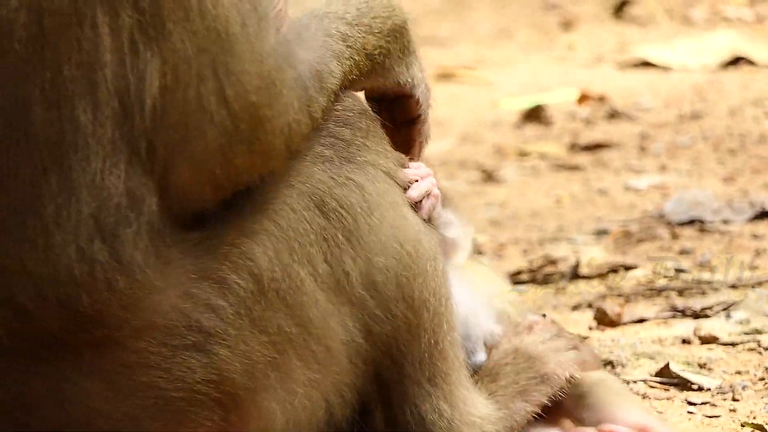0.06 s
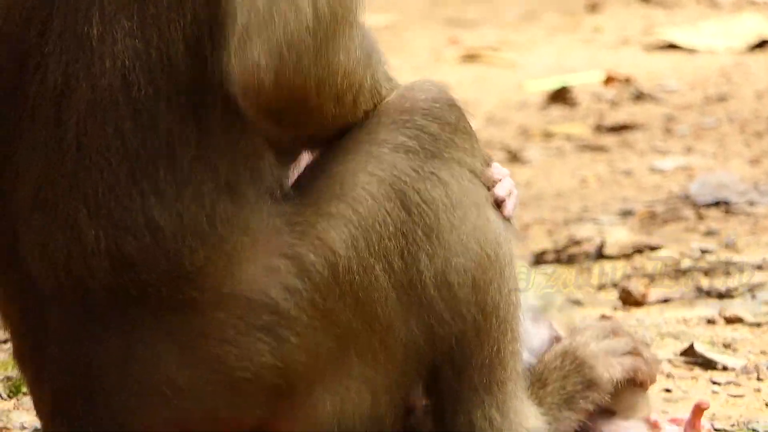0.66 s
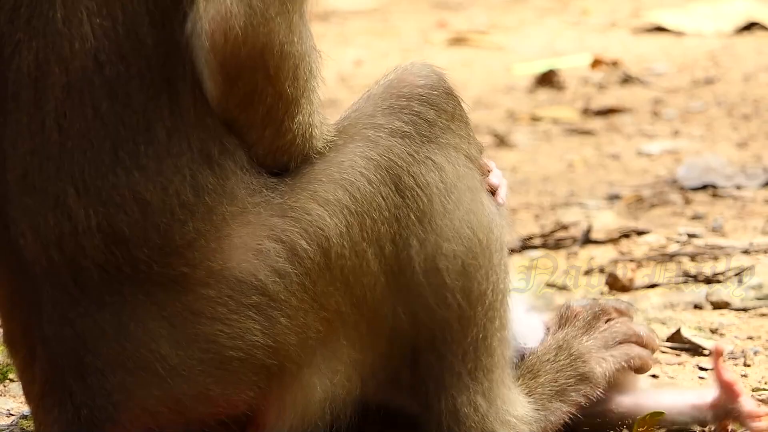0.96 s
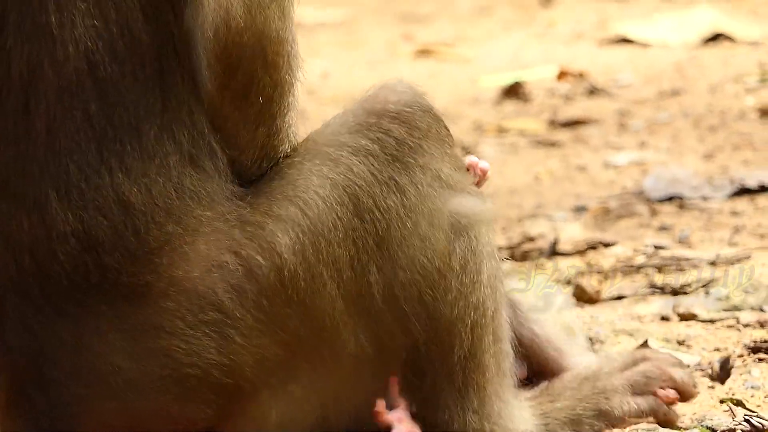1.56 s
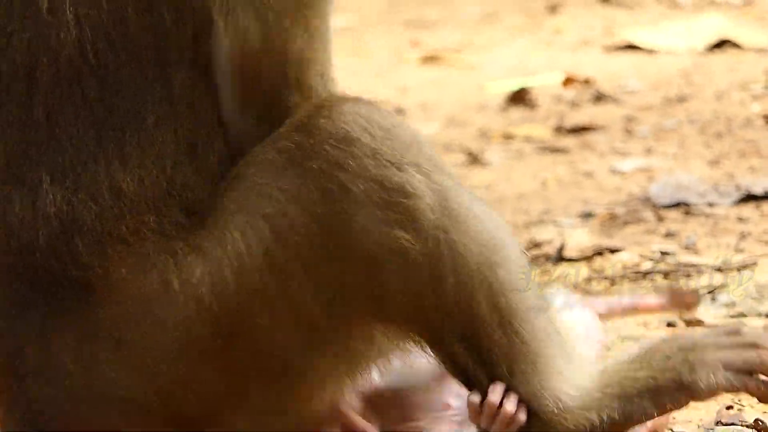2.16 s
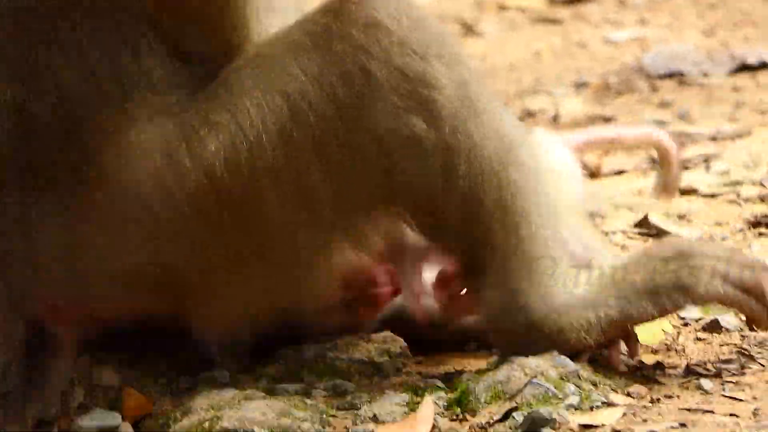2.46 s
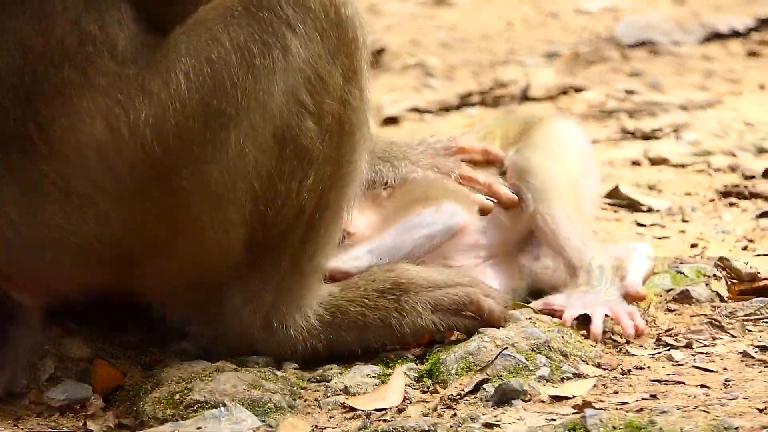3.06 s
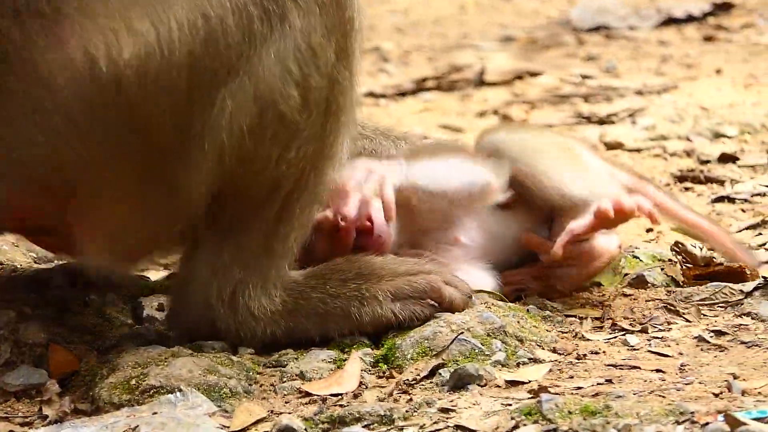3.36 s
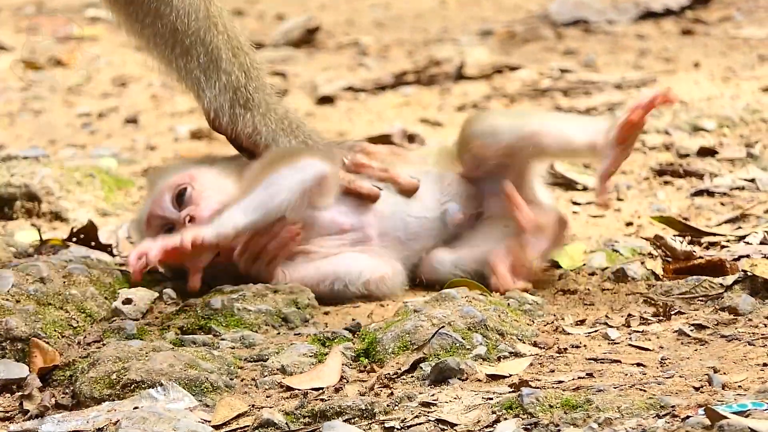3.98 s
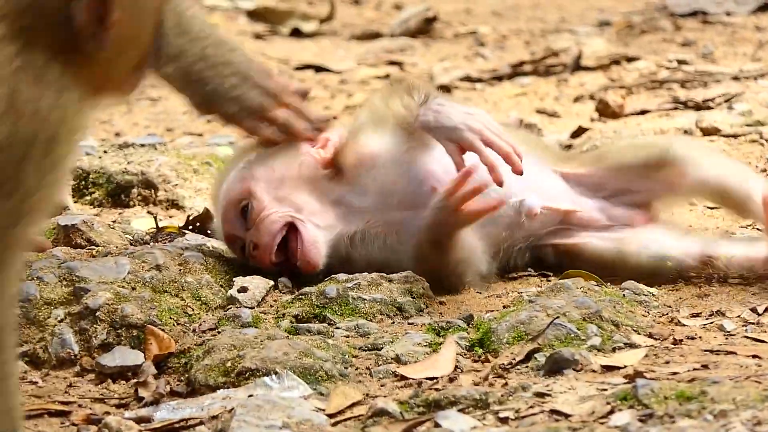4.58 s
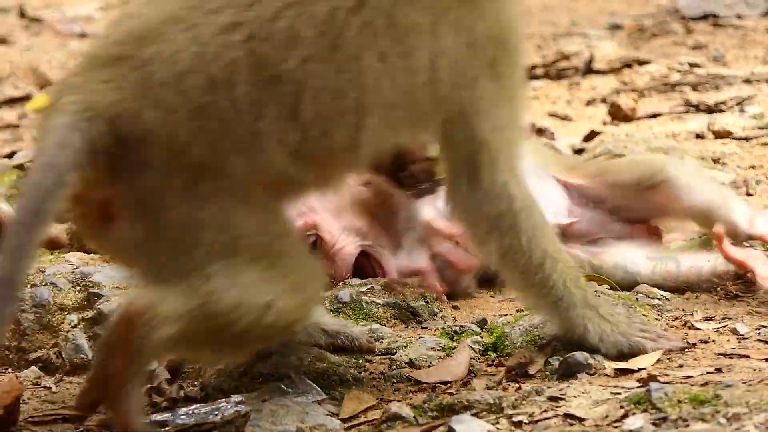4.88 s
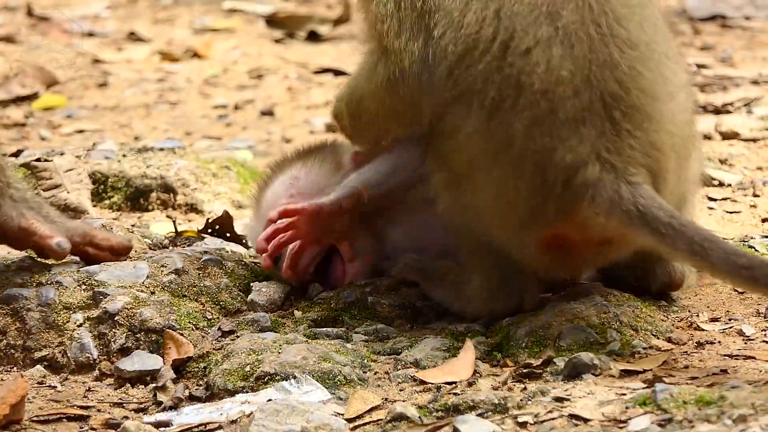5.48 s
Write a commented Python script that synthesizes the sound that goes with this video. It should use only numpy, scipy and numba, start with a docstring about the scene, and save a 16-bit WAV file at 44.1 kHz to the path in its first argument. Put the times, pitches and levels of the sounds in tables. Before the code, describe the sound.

Shrill, raspy cries from a baby monkey come in quick bursts, mixed with thin whistles, small gasps and light leaf scuffs.

```python
"""Faint far calls and leafy scuffs, then a fast run of harsh screeches from an infant macaque close by.
An adult holds it down on dry ground. Its vocal folds flip between chaos, a strained tone and thin
whistles, its throat and mouth ring along, and it gasps between the last cries.
Trees return a soft tail of echoes; outdoor air and a low distant rumble lie behind."""
import sys
import numpy as np
from scipy import signal
from scipy.fft import rfft, irfft, next_fast_len
from scipy.io import wavfile
from scipy.ndimage import uniform_filter1d
from numba import njit

SR = 44100
rng = np.random.default_rng(int(sys.argv[2]) if len(sys.argv) > 2 else 0)


def master(y):
    """Save y as 16-bit WAV."""
    cut = np.clip(np.atleast_2d(y).T, -1, 1)
    pcm = np.round(cut * 32767)  # scale
    wavfile.write(sys.argv[1], SR, pcm.astype(np.int16))


N = 252724
TIME = np.arange(N) / SR

# A cry is two pushes with a break between. Each row: start, break and end in seconds; first push, second
# push and dip at the break in dB; mouth resonance in each push and its width in Hz; throat and shrill
# top in dB. These are base values, which CRY_STAGES bends.
CRIES = [(1.142, 1.161, 1.19, -48.5, -66, 1, 4000, 3800, 1180, -43, -67.5),
         (1.302, 1.335, 1.373, -26.5, -28, 5, 4250, 3840, 950, -42, -45),
         (1.483, 1.514, 1.532, -33.5, -33, 2, 4700, 3590, 1900, -34.5, -42.5),
         (1.738, 1.753, 1.83, -32.5, -47, 6, 3650, 3426, 1320, -49.5, -53),
         (2.146, 2.154, 2.193, -39.5, -67, 11, 4600, 4600, 2000, -39, -57),
         (2.253, 2.302, 2.314, -18, -12.5, 10.5, 3950, 4314, 1283, -35.5, -35.5),
         (2.559, 2.601, 2.624, -22, -22, 12.5, 4150, 3970, 1020, -36, -35),
         (2.804, 2.831, 2.855, -31, -40, -3.5, 3350, 3266, 1005, -37.5, -51),
         (2.857, 2.898, 2.906, -32, -41, 3.5, 3247, 3460, 950, -39, -44.5),
         (3.033, 3.077, 3.157, -25, -24.5, 8.5, 3650, 4070, 1300, -34, -39),
         (3.313, 3.34, 3.365, -34.5, -40, 3, 3600, 3166, 1196, -35.5, -48),
         (3.379, 3.383, 3.397, -25.5, -33.5, -1.5, 3200, 3500, 910, -37, -47.5),
         (3.549, 3.565, 3.598, -38, -50.5, 30, 3500, 3400, 1610, -39, -48.5),
         (3.737, 3.767, 3.778, -38.5, -48, 12, 3310, 3547, 1087, -39, -49),
         (3.916, 3.957, 4.022, -32.5, -28.5, 10.5, 3850, 4067, 1096, -33.5, -39),
         (4.146, 4.198, 4.256, -29.5, -25, 5, 4200, 4454, 1400, -32, -34.5),
         (4.447, 4.488, 4.602, -25.5, -27.5, 3.5, 4500, 4750, 1667, -36, -30.5),
         (4.783, 4.867, 4.99, -30.5, -32.5, 0, 4065, 5400, 1570, -39, -43),
         (5.158, 5.222, 5.312, -29, -30.5, 0.5, 4400, 4800, 1586, -37.5, -44),
         (5.495, 5.537, 5.6, -27, -24, 3.5, 3450, 4317, 1396, -31.5, -44)]
# The airway's tone, with a gap near 1600 Hz. Each row: frequency in Hz, gain in dB.
AIRWAY_TONE = [(500, -17), (800, 6), (1400, -2.5), (1600, -9.5), (1720, -7), (2020, 1), (2450, 1),
               (2700, 1.5), (3000, 0.5)]


def screeches(whistling, attack_s=0.0044, release_s=0.0058, rasp_db=1.5, rasp_hz=130):
    """The infant's vocal folds make its mouth, throat, teeth and chest ring."""
    mouth_db, mouth_hz, width_hz, throat_db, top_db, chest_db = cry_course(CRIES)
    pitch, rough, boost_db = fold_state()
    gate = np.max([held(start, end, attack_s, release_s) for start, _, end, *_ in CRIES], axis=0)
    buzz = vocal_folds(pitch, rough)
    # a whistle takes its share of the air from the rough voice
    whistle_share = uniform_filter1d(whistling ** 2, SR // 200) / from_db(2 * mouth_db)
    air_left = np.sqrt(np.clip(1 - whistle_share, .3, 1))
    voice = from_db(mouth_db) * mouth(buzz, rough, mouth_hz, width_hz) * air_left
    voice += from_db(throat_db + boost_db) * throat(buzz, pitch)
    voice += from_db(top_db) * teeth(buzz)
    voice += from_db(chest_db) * chest(buzz)
    # the folds catch and let go unevenly
    rasp = rms_one(from_db(rasp_db * np.clip(wander(rasp_hz), -2, 1.5)))
    return coloured(voice * rasp * gate, AIRWAY_TONE)


# The five stages of a cry: onset, first push, break, second push, end. Each row: mouth change in dB,
# mouth resonance multiplier, throat change in dB, top change in dB, chest relative to throat in dB.
CRY_STAGES = [(-5, 0.93, -6, -3.5, -17.5), (0.5, 0.98, -3, -2.5, -12.5), (0, 0.94, 0.5, -3.5, -10),
              (0.5, 0.99, -5.5, 1.5, -11.5), (-4, 0.92, -15.5, -7, -5.5)]


def cry_course(cries, swell_s=.016, recover_s=.025):
    """Curves through each cry: mouth level, resonance and width, then throat, top and chest levels."""
    mouth_step, mouth_ratio, throat_step, top_step, chest_step = np.transpose(CRY_STAGES)
    rows = []
    for start, crack, end, db1, db2, dip_db, hz1, hz2, width_hz, throat_base, top_base in cries:
        push1 = min(start + swell_s, (start + crack) / 2)
        push2 = min(crack + recover_s, (crack + end) / 2)
        effort_db = two_pushes(db1, db2, dip_db)
        swing_db = effort_db - (db1 + db2) / 2   # the shrill top follows the effort
        throat_db = throat_base + throat_step
        rows += zip([start, push1, crack, push2, end], effort_db + mouth_step,
                    two_pushes(hz1, hz2, 0) * mouth_ratio, [width_hz] * 5,
                    throat_db, top_base + top_step + swing_db, throat_db + chest_step)
    times, *columns = np.transpose(rows)
    return [np.interp(TIME, np.sort(times), column) for column in columns]


def two_pushes(first, second, dip):
    """A value at the five stages: held through each push, lowered by dip at the break."""
    return np.array([first, first, (first + second) / 2 - dip, second, second])


# Moments of strained tone. Each row: start and length in seconds; first, middle and last pitch in Hz;
# roughness from 0 to 1; throat boost in dB.
STRAINS = [(3.985, .035, 2230, 1999, 2252, 0.33, 11), (4.229, 0.045, 2216, 2239, 2137, 0.48, -4.5),
           (4.532, 0.099, 2348, 2349, 2139, 0.37, -0.5), (4.78, 0.0128, 2299, 2296, 2222, 0.33, 18),
           (4.86, 0.021, 2274, 2341, 2336, 0.48, -11), (4.888, .04, 2281, 2291, 2479, 0.38, 7),
           (5.211, .075, 2172, 2281, 1995, 0.2, 1), (5.496, 0.019, 2450, 2341, 2233, 0.23, 7),
           (5.539, 0.017, 2300, 2397, 2258, 0.47, 7)]


def fold_state(chaos_hz=2195.0, chaos_roughness=.88, lock_s=0.00783):
    """Pitch, roughness and throat boost: chaos, except where the folds lock onto an arc of pitch."""
    pitch, rough, boost_db = np.full(N, chaos_hz), np.full(N, chaos_roughness), np.zeros(N)
    for start, length, first, middle, last, roughness, db in STRAINS:
        lock = held(start, start + length, lock_s, lock_s)
        progress = np.clip((TIME - start) / length, 0, 1)
        arc = np.polyval(np.polyfit([0, .5, 1], [first, middle, last], 2), progress)
        pitch += lock * (arc - pitch)
        rough += lock * (roughness - rough)
        boost_db += lock * db
    return pitch, rough, boost_db


def vocal_folds(pitch, rough):
    """Puffs of air that throb at a third of the pitch; roughness upsets their timing and strength."""
    rough = np.clip(rough, 0, 1) ** 1.4
    waver = .03 * (rough + .15) * wander(800) + .05 * rough * wander(120)
    phase = 2 * np.pi * np.cumsum(pitch * (1 + waver)) / SR
    pulses = rms_one(sum(np.cos(k * phase) for k in np.arange(1, 8)))
    throb = 1.15 * np.cos(phase / 3 + rough * wander(300))
    strength = 1 - .45 * rough + throb + 1.1 * rough * wander(1000)
    breath = .5 * (rough + .2) * rng.standard_normal(N) * (1 + np.cos(phase) / 2)
    return pulses * strength + breath


# The mouth's steady peaks and gaps. Each row: frequency in Hz, gain in dB.
MOUTH_TONE = [(1000, -20), (1700, -30), (2300, -10), (2700, -7), (3150, 3), (3700, 0), (4350, 2),
              (4850, -2), (5400, 1), (6500, 1), (7500, -4), (9000, -12)]


def mouth(buzz, rough, hz, width_hz):
    """A quivering resonance; the narrower it is, the more of a rough cry turns into squeal."""
    quiver = 1 + .055 * wander(70)
    ring = steep_resonance(buzz, hz * quiver, 1.57 * width_hz)
    ring = evened(coloured(ring, MOUTH_TONE), window_s=0.0122)
    squeal_share = np.clip(rough * (1900 - width_hz) / 1500 * (1 + .6 * wander(50)), 0, .8)
    return np.sqrt(1 - squeal_share) * ring + np.sqrt(squeal_share) * squeal(hz)


def squeal(hz):
    """The folds lock onto the mouth resonance and zigzag around it."""
    zigzag = 1 + .085 * wander(160) + .04 * wander(900)
    phase = 2 * np.pi * np.cumsum(hz * zigzag) / SR
    return np.sqrt(2) * (np.sin(phase) + .08 * np.sin(2 * phase))


def throat(buzz, pitch, rest_hz=2250):
    """The throat rings midway between its own note and the pitch of the folds."""
    hz = np.sqrt(rest_hz * pitch) * (1 + .04 * wander(60))
    return evened(steep_resonance(buzz, hz, width_hz=560), window_s=0.0097)


# High resonances at the teeth. Each row: frequency in Hz, width in Hz, relative level in dB.
TEETH_RINGS = [(7190, 610, 3.5), (8850, 950, 1.5), (9840, 220, 10.5), (10720, 640, 2), (11600, 1700, -8),
               (14700, 1400, -19)]


def teeth(buzz, roaming_hz=10000):
    """The shrill top of the cry: steady resonances plus one that roams."""
    steady = rms_one(cavity(buzz, TEETH_RINGS))
    roaming = rms_one(steep_resonance(buzz, roaming_hz * (1 + .09 * wander(35)), width_hz=800))
    return evened(steady + .7 * roaming, window_s=0.013)


# Low resonances of the airway. Each row: frequency in Hz, width in Hz, relative level in dB.
CHEST_RINGS = [(860, 260, 0), (1300, 380, -3)]


def chest(buzz):
    """The chest rings low and gives the cry some body."""
    return evened(cavity(buzz, CHEST_RINGS), window_s=0.0098)


# Thin whistles. Each row: start and length in seconds, first and last pitch in Hz, level in dB.
WHISTLES = [(1.474, 0.013, 6300, 5600, -31), (1.522, 0.021, 2930, 2960, -30.5),
            (1.536, 0.028, 3150, 4200, -36), (1.55, 0.0086, 5060, 5630, -26.5),
            (1.559, 0.016, 5800, 4950, -32.5), (2.125, .02, 5398, 4900, -36),
            (2.243, .015, 2700, 3320, -33.5), (2.319, .019, 4170, 4580, -18),
            (2.339, .028, 4130, 4630, -20.5), (2.38, 0.015, 5676, 5280, -27),
            (2.546, .008, 4690, 5330, -25.5), (2.612, 0.016, 3700, 4680, -24.5),
            (2.649, 0.0085, 4600, 3820, -33.5), (2.859, .012, 2920, 3320, -27.5),
            (3.138, 0.01446, 3448, 4500, -33), (3.155, 0.015, 4720, 3300, -28.5),
            (3.183, 0.024, 4380, 4480, -34), (4.226, 0.0575, 4400, 4200, -27),
            (4.545, 0.06, 11200, 9800, -37.5), (4.884, .022, 5605, 5050, -33.5),
            (4.92, 0.027, 6260, 6220, -36), (5.0, .011, 4700, 3700, -41.5), (5.21, 0.077, 5300, 5050, -33),
            (5.26, 0.037, 3500, 3170, -32.5), (5.313, .017, 4420, 4160, -39),
            (5.494, 0.016, 2810, 3250, -27), (5.578, 0.033, 5200, 5150, -28),
            (5.612, .022, 2850, 2870, -36.5), (5.662, .021, 4050, 4580, -30)]


def whistles():
    """The folds flick into a nearly pure tone, mostly as a cry catches or lets go."""
    return glides(WHISTLES, arch=0.0232, overtone_db=-20, harmonics=2,
                  jitter=.028, jitter_hz=600, flutter_db=2.5, fade=.25)


# The infant's gasps. Each row: start in seconds, length in seconds, level in dB before GASP_TONE.
GASPS = [(4.355, .063, -52), (4.695, .062, -51.5), (5.04, 0.0822, -51), (5.403, 0.061, -53.5)]
# The tone of a gasp. Each row: frequency in Hz, gain in dB.
GASP_TONE = [(300, 8), (430, 2.5), (850, 5), (1300, 4.5), (1700, -11), (2150, 11.5), (2800, -15),
             (6000, -35)]


def gasps(from_hz=370, to_hz=474):
    """Squeaky breaths between the last cries, all rising alike."""
    rises = [(start, length, from_hz, to_hz, db) for start, length, db in GASPS]
    squeaks = glides(rises, arch=0, overtone_db=-.3, harmonics=10,
                     jitter=.015, jitter_hz=400, flutter_db=2, fade=.3)
    return coloured(squeaks, GASP_TONE)


# Scuffs in dry leaves. Each row: start in seconds, base level in dB, the thud's offset from it in dB.
SCUFFS = [(0.239, -48.5, -7), (0.834, -40, -30), (0.954, -48.5, -21), (1.941, -39.5, -31),
          (3.401, -44.5, -12), (4.425, -45, -8.5), (4.674, -34, -18), (5.129, -37, -26), (5.357, -44, -29)]
# The tone of the crackle. Each row: frequency in Hz, relative level in dB.
LEAF_TONE = [(400, -21), (1200, 5), (2500, -10), (5000, 0.5), (11000, -16), (16000, -40)]


def scuffs(rise_s=0.00039, crackle_decay_s=0.017, thud_decay_s=0.079, crackle_db=-8, thud_db=-2):
    """Limbs brush the fallen leaves: a brief crackle over a soft thud."""
    crackle, thud = np.zeros(N), np.zeros(N)
    for start, db, offset_db in SCUFFS:
        age = np.maximum(TIME - start, 0)
        rise = np.minimum(age / rise_s, 1)
        crackle += from_db(db + crackle_db) * rise * np.exp(-age / crackle_decay_s)
        thud += from_db(db + offset_db + thud_db) * rise * np.exp(-age / thud_decay_s)
    grains = rng.standard_normal(N) * from_db(5 * wander(800))
    return crackle * rms_one(coloured(grains, LEAF_TONE)) + thud * noise_band(hz=318, width_hz=110)


# Far calls and hoots. Each row: start and length in seconds, first and last pitch in Hz, level in dB.
FAR_CALLS = [(.075, .16, 1023, 996, -53), (.11, 0.083, 321, 265, -62.5), (.14, 0.069, 401, 410, -60),
             (.21, 0.15, 1026, 775, -53), (.35, 0.14, 1467, 1245, -63), (2.385, 0.13, 960, 816, -48.5),
             (2.43, 0.065, 331, 343, -54.5), (2.46, .12, 853, 694, -50.5), (2.62, .19, 1360, 1250, -59.5),
             (2.99, 0.08, 265, 199, -61), (3.09, 0.12, 201.5, 181, -56.5), (3.22, 0.082, 310, 335, -56)]


def far_calls():
    """Distant voices: faint, nearly pure tones that slide a little."""
    return glides(FAR_CALLS, arch=0.012, overtone_db=-23, harmonics=2,
                  jitter=0.0058, jitter_hz=83, flutter_db=2.5, fade=0.13)


# The tone of the echoes from the trees. Each row: frequency in Hz, gain in dB.
ECHO_TONE = [(200, 8), (1000, 3.5), (2300, 0), (4500, 3.5), (7000, 9), (11000, 1), (16000, 5)]


def trees(sound, tail_s=1.0, tail_db=-17, near_s=0.19, near_db=-15, ground_s=0.00166, ground_db=-14):
    """A ground bounce, a faint short stereo spread, quick echoes nearby, then a long tail from trees."""
    shape = from_db(tail_db) * die_away(tail_s) + from_db(near_db) * die_away(near_s)
    echoes = [coloured(rng.standard_normal(SR), ECHO_TONE) * shape for _ in range(2)]
    middle, side = [signal.fftconvolve(sound, echo)[:N] for echo in echoes]
    bounce = from_db(ground_db) * np.interp(TIME - ground_s, TIME, sound)
    stereo_spread = from_db(-30) * rng.standard_normal(SR) * die_away(seconds=0.013)
    spread = signal.fftconvolve(sound, stereo_spread)[:N]
    return stereo(sound + bounce + middle, from_db(.5) * treble_width(side) + spread)


# The rumble and hiss of outdoor air. Each row: frequency in Hz, relative level in dB.
AIR_TONE = [(15, -89), (25, -35), (70, -19.5), (91, -8), (130, -5.5), (161, -5.5), (317, -14.5), (795, -17),
            (1400, -13), (1740, -19.5), (2160, -20.5), (2410, -21), (6200, -29), (11500, -25), (16000, -46)]


def background(air_db=-57.5, drone_db=-63):
    """Outdoor air, wide only in the treble, and a distant wavering drone."""
    air = rms_one(coloured(rng.standard_normal(N), AIR_TONE)) * from_db(air_db + .4 * wander(3))
    side = rms_one(coloured(rng.standard_normal(N), AIR_TONE)) * from_db(air_db + 1)
    drone = from_db(drone_db) * noise_band(hz=178, width_hz=45)
    return stereo(air + drone, treble_width(side))


# How wide the air and echoes sound. Each row: frequency in Hz, gain of the side signal in dB.
STEREO_WIDTH = [(30, -11), (60, -23), (110, -23), (200, -27), (380, -21), (700, -25.5), (1290, -26),
                (2380, -28), (4400, -29.5), (8120, -13), (15000, -0.5)]


def treble_width(side):
    """Keep mostly the treble of a side signal, so lower sounds stay near the centre."""
    return coloured(side, STEREO_WIDTH)


def stereo(middle, side):
    """Add the side signal on the left and subtract it on the right."""
    return middle + side * np.array([[1], [-1]])


def glides(rows, arch, overtone_db, harmonics, jitter, jitter_hz, flutter_db, fade):
    """Short sliding tones. Arch and jitter are shares of the pitch; fade is a share of the length."""
    out = np.zeros(N)
    shake = 1 + jitter * wander(jitter_hz)
    flutter = from_db(flutter_db * wander(jitter_hz / 2))
    for start, length, first, last, db in rows:
        at = np.flatnonzero((TIME > start) & (TIME < start + length))
        progress = (TIME[at] - start) / length
        hz = (first + (last - first) * progress) * (1 + arch * np.sin(np.pi * progress))
        phase = 2 * np.pi * np.cumsum(hz * shake[at]) / SR
        tone = sum(from_db(overtone_db * k) * np.sin((k + 1) * phase) for k in range(harmonics))
        shape = np.sin(np.pi / 2 * np.clip(np.minimum(progress, 1 - progress) / fade, 0, 1))
        out[at] += from_db(db) * rms_one(tone) * shape * flutter[at]
    return out


def held(start, end, attack_s, release_s):
    """Fade in before start, hold, and fade out after end."""
    return np.interp(TIME, [start - attack_s, start, end, end + release_s], [0, 1, 1, 0])


def die_away(seconds):
    """A fade with a total energy of one that drops 60 dB in the given time."""
    return from_db(-60 * TIME[:SR] / seconds) * np.sqrt(2 * np.log(1000) / (seconds * SR))


def from_db(db):
    """Turn decibels into a multiplier."""
    return 10 ** (np.asarray(db) / 20)


def rms_one(x):
    """Scale the average strength (rms) to one."""
    return x / np.sqrt(np.mean(x ** 2) + 1e-20)


def evened(x, window_s):
    """Hold the strength at one; flutter faster than the window stays."""
    return x / np.sqrt(np.abs(uniform_filter1d(x ** 2, int(window_s * SR))) + 1e-12)


def wander(rate_hz):
    """Random motion of strength one, mostly slower than the given rate."""
    lowpass = signal.butter(2, rate_hz, fs=SR, output="sos")
    return rms_one(signal.sosfilt(lowpass, rng.standard_normal(N + SR))[SR:])


def noise_band(hz, width_hz):
    """A narrow band of noise of strength one."""
    return rms_one(cavity(rng.standard_normal(N), [(hz, width_hz, 0)]))


def coloured(x, points):
    """Shape the tone along a curve of (Hz, dB) points."""
    hz, db = np.transpose(points)
    size = next_fast_len(len(x) + SR // 10)
    bins = np.maximum(np.fft.rfftfreq(size, 1 / SR), 1)
    gain = from_db(np.interp(np.log(bins), np.log(hz), db))
    return irfft(rfft(x, size) * gain, size)[:len(x)]


def resonance(x, hz, width_hz):
    """Let through a band around one frequency."""
    r = np.exp(-np.pi * width_hz / SR)
    feedback = [1, -2 * r * np.cos(2 * np.pi * hz / SR), r * r]
    return signal.lfilter(np.array([1, 0, -1]) * (1 - r * r) / 2, feedback, x)


def cavity(x, rings):
    """A hollow space: several steep resonances ring side by side."""
    return sum(from_db(db) * (-1) ** k * resonance(resonance(x, hz, width), hz, width)
               for k, (hz, width, db) in enumerate(rings))


def steep_resonance(x, hz, width_hz):
    """A moving resonance applied twice for steeper sides."""
    width_hz = np.maximum(width_hz, 200) * np.ones(N)
    return moving_resonance(moving_resonance(x, hz, width_hz), hz, width_hz)


@njit
def moving_resonance(x, hz, width_hz):
    """Let through a band whose centre and width change over time."""
    y, state = np.zeros(len(x)), 0j
    for i in range(len(x)):
        r = np.exp(-np.pi * width_hz[i] / SR)
        state = state * r * np.exp(2j * np.pi * hz[i] / SR) + (1 - r) * x[i]
        y[i] = state.real
    return y


def scene():
    """The infant close by and straight ahead, everything else behind it."""
    whistling = whistles()
    voices = gasps() + far_calls() + screeches(whistling) + whistling
    return trees(voices + scuffs()) + background()


def record(dry, low_hz=32, high_hz=15700):
    """Soften the lowest rumble and cut the very top steeply."""
    trimmed = signal.sosfilt(signal.butter(2, low_hz, "high", fs=SR, output="sos"), dry)
    return signal.sosfilt(signal.ellip(12, .1, 80, high_hz, fs=SR, output="sos"), trimmed)


dry = scene()
out = record(dry)
master(out)
```